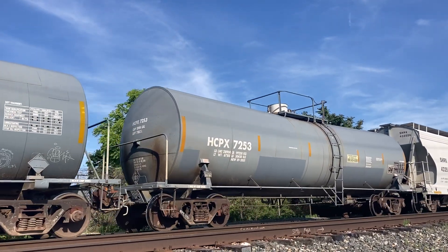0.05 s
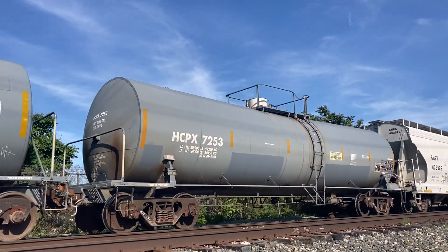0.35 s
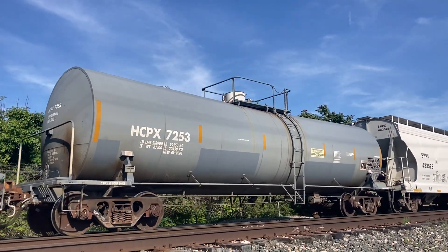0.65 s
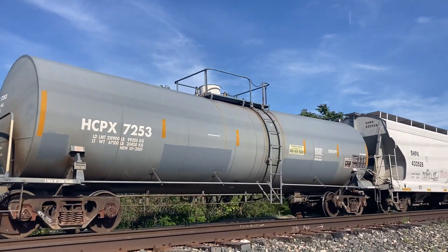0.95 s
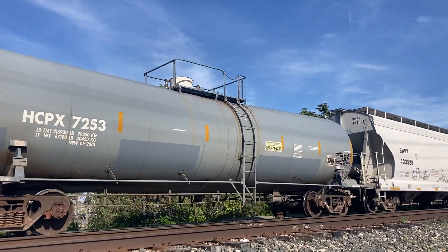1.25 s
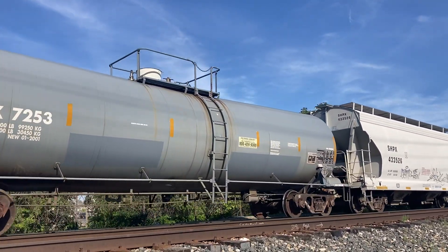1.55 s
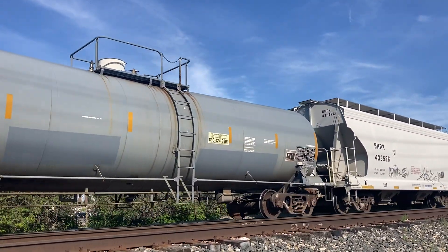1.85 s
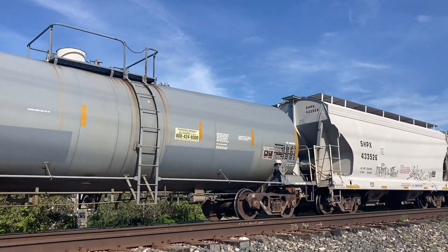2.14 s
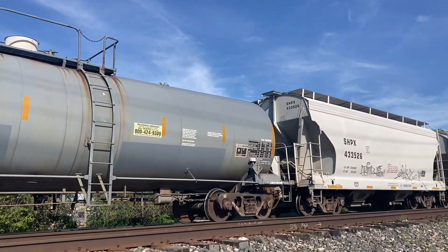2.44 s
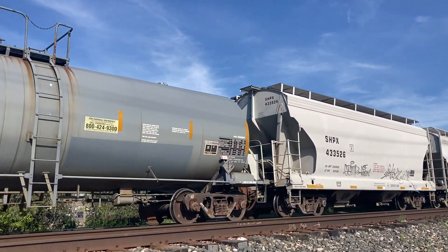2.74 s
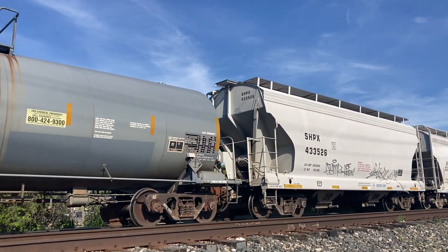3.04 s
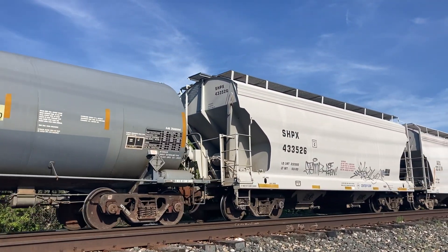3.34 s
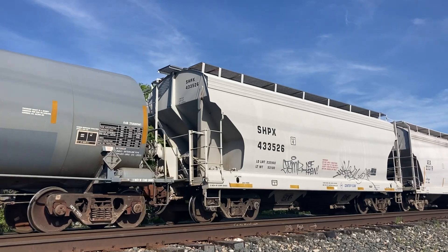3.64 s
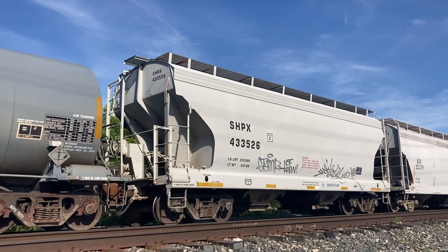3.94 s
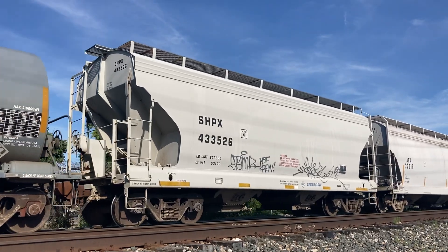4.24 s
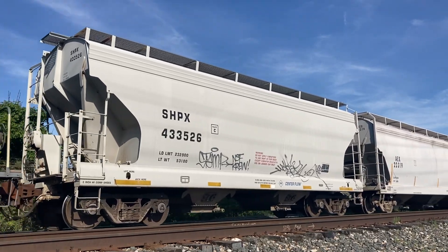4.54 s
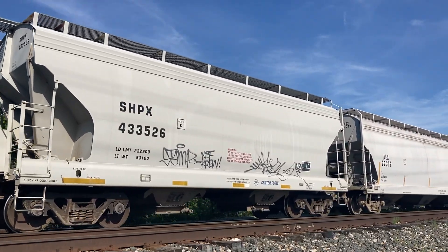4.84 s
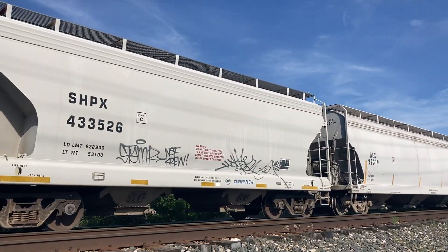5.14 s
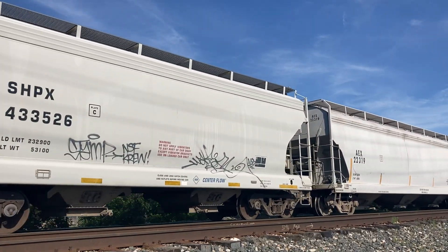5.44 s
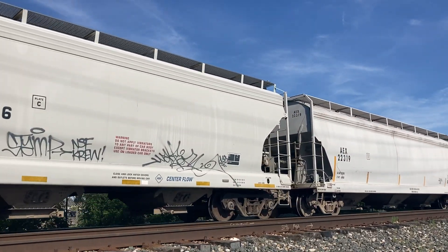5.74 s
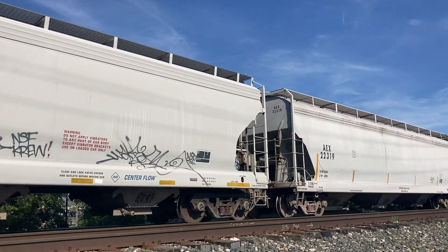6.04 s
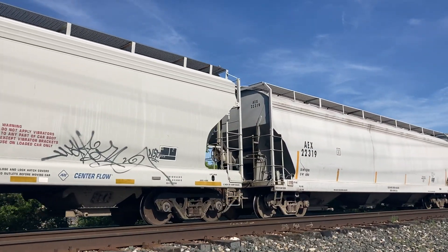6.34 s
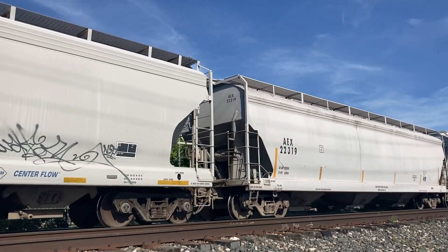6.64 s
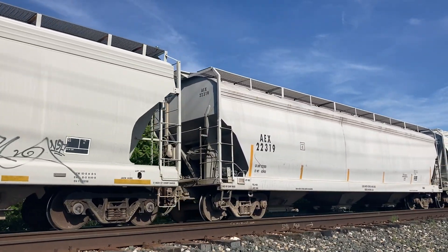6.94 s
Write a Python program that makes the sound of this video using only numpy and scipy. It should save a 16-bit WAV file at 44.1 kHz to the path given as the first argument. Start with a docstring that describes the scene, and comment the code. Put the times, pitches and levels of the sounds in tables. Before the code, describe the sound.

Heard in stereo from beside an outdoor track, a freight train passes with a continuous low rumble and a background roar to the left. Loose metal gear rattles and clanks at first, then a few thin chirps appear. Sharper clanks come around the middle, followed by a short sinking groan. Toward the end, rhythmic wheel grinding, rasping scrapes and squeaks build as a worn wheel comes level with the microphone.

```python
"""A low rumble is heard first: freight cars roll from right to left, shaken by their rough treads.
One worn wheel draws nearer, grinding and throbbing in the same pattern on every turn.
Rolling contact makes the rails sing under each near bogie; slipping steel scrapes, chirps and groans.
Loose gear knocks and clanks, and in the background the cars down the line roar from the left."""
import sys
import numpy as np
from scipy import signal
from scipy.fft import rfft, irfft
from scipy.io import wavfile
from scipy.ndimage import uniform_filter1d, map_coordinates

SR = 44100
rng = np.random.default_rng(int(sys.argv[2]) if len(sys.argv) > 2 else 0)


def int16_out(signal):
    """Quantize to a 16-bit WAV file."""
    q = np.round(np.clip(np.atleast_2d(signal).T, -1, 1) * 32767)
    wavfile.write(sys.argv[1], SR, q.astype(np.int16))


N = 312228
TIME = np.arange(N) / SR
FREQ = np.maximum(np.fft.rfftfreq(N, 1 / SR), 1)

# modes of car bodies, rails, wheels and a coupler: (frequency [Hz], half-width [Hz], level [dB])
BODY_MODES = [(42.4, 17, -14.5), (60, 7.3, -1.5), (65.7, 12, -1.5), (82.6, 17.7, -5.5)]
TRACK_MODES = [(990, 38, 7.5), (1135, 21, 8.5), (1383, 69, 7.5)]
WHEEL_MODES = [(2060, 110, 2.5), (2628, 60, 0.5), (3290, 220, 0.5), (3845, 30, -3), (4070, 104, -1),
               (4935, 18, -5), (5295, 55, -7), (6820, 37, 5.5), (7130, 25, -1), (7800, 64, 6),
               (8040, 72, 3.5), (9880, 76, 7.5), (10320, 91, 5.5), (11200, 86, 0)]
COUPLER_MODES = [(1130, 80, 2), (1340, 95, 4), (1803, 34, 1), (2076, 88, -1), (3750, 80, -12)]
# spectra of the broadband sounds: (frequency [Hz], relative spectral density [dB])
FRAME_SPECTRUM = [(80, -20), (110, 4), (150, -3.5), (195, -7), (240, -18.5), (400, -26.5), (800, -64)]
RAIL_SPECTRUM = [(300, 1.5), (700, 1.4), (1000, 0.5), (1400, -3), (1750, -20), (2300, -1), (3200, -23)]
GRIND_SPECTRUM = [(1200, 4.5), (2000, -5.5), (2600, -1.5), (3100, -3), (4200, -3.5), (5000, -9.5),
                  (5800, -10.5), (7000, -13.5)]
HISS_SPECTRUM = [(4500, -68), (6000, -6), (7000, 1), (7900, 2.5), (8700, -4), (10200, -5), (11500, -4.5),
                 (13000, -8), (15500, -19)]
CRASH_SPECTRUM = [(300, -25), (1300, 11), (2600, -6), (4500, 0.5), (8000, -3), (15000, -12)]
ROAR_SPECTRUM = [(150, -14.5), (240, -2.5), (315, 1), (500, -2.5), (800, -9), (1200, -15), (1600, -14.5),
                 (2100, -20), (2700, -22), (3300, -35.5), (4400, -24), (6000, -43.5)]
# throbs of the low rumble, each a brief fading bass tone: (time [s], level [dB], frequency [Hz])
BASS_THROBS = [(0.306, -14, 78), (.62, -18.5, 78), (0.776, -12, 66.2), (.97, -16, 70.5), (1.223, -13.5, 73),
               (1.349, -12, 78.1), (2.019, -14.5, 67), (2.151, -12, 71.8), (2.656, -12.5, 72.8),
               (2.788, -12.5, 75.7), (3.06, -15, 89), (3.496, -16, 72.7), (3.845, -14.5, 81.8),
               (4.002, -14, 82), (4.149, -14, 79.3), (4.32, -14.5, 70.5), (4.485, -12.5, 74),
               (4.723, -13, 64.2), (5.032, -12.5, 86), (5.148, -10.5, 76.4), (5.253, -17, 71.2),
               (5.505, -12.5, 70), (5.634, -11.5, 68.2), (5.79, -8, 79.3), (5.945, -10.5, 77.2),
               (6.034, -17, 79.5), (6.137, -12, 82.2), (6.511, -8.5, 75), (6.633, -11.5, 81.2),
               (6.755, -11, 73.4), (6.979, -20, 79), (7.036, -10.5, 65.3)]
# one turn of the worn tread: (position [turns], rubbing [dB], frame drone [dB], body shake [dB])
TREAD_PROFILE = [(.02, -8, -2, 1), (.08, 3.5, 1, 2.5), (.17, 1.2, 2, 0.5), (.25, 2.5, 0, 2),
                 (.34, -1.5, 4, -1.5), (.43, 5, 2.2, 3), (.53, 3.5, 0.5, 1.5), (.66, 2, 2.6, 1.3),
                 (.77, 0.5, 2, 2), (.88, -1, -2.5, 1), (.96, -2.5, -0.5, -1)]
# boom of the hopper walls, song of the rails and roar down the line: (time [s], level [dB])
WALL_ENVELOPE = [(0, -41.5), (2.9, -50), (3.6, -41.5), (4.6, -39), (5.5, -42.5), (7.08, -38.5)]
RAIL_ENVELOPE = [(0, -53), (0.9, -47), (1.76, -53.5), (3.43, -45), (3.59, -43), (4.35, -40.5), (4.6, -45),
                 (5.55, -46.5), (6.04, -39.5), (6.22, -44.5), (6.59, -40), (6.85, -42.5), (6.96, -47),
                 (7.05, -35)]
ROAR_ENVELOPE = [(0, -37.5), (.5, -35.5), (1.05, -37.5), (1.45, -36), (1.8, -38), (3.2, -37.5), (4.2, -38),
                 (5.3, -37.5), (6.0, -35), (7.08, -37)]
# direction of the loudest near bogie: (time [s], lag of the left microphone port [ms])
BOGIE_LAG = [(0, 0.13), (3.0, 0.098), (3.6, 0.15), (4.1, -0.12), (4.5, -0.13), (4.8, 0.1), (5.6, 0.067),
             (6.3, 0.034), (7.08, -0.07)]
# slips of treads and flanges: (mid time [s], length [s], centre [Hz], grinding [dB], hiss [dB])
TREAD_SLIPS = [(1.873, 0.063, 3900, -49, -59), (2.49, 0.052, 2500, -45, -58),
               (3.045, 0.082, 2420, -47, -52.5), (3.7, 0.072, 1500, -49, -55),
               (3.805, 0.08, 1730, -42, -54), (4.325, 0.33, 1300, -45.5, -56),
               (4.913, 0.1, 3180, -42.5, -55), (5.068, 0.04, 3006, -40, -47),
               (5.705, 0.15, 3900, -45.5, -51), (5.86, 0.17, 2880, -39.5, -51),
               (6.054, .09, 1100, -47, -62), (6.572, 0.11, 2000, -39.5, -41.5),
               (6.686, 0.032, 1700, -41, -47), (6.807, 0.11, 1700, -42.5, -45.5),
               (7.06, 0.063, 3200, -39, -57)]
# knocks of springs and side frames: (time [s], level [dB], decay time [s], centre [Hz])
BOGIE_KNOCKS = [(.396, -28, .09, 500), (.422, -28, .1, 880), (.446, -26.5, 0.22, 315),
                (.494, -31, 0.32, 624), (.516, -32.5, .4, 322), (0.909, -28, 0.25, 377),
                (1.272, -30, 0.21, 320), (1.436, -30.5, 0.21, 500), (1.491, -31.5, 0.13, 360),
                (2.594, -34, .1, 348), (2.97, -31, 0.12, 476), (3.245, -27.5, 0.17, 195),
                (3.372, -26.5, 0.11, 325), (3.675, -37, .15, 190), (4.15, -30, 0.22, 190),
                (4.86, -33, 0.57, 203), (5.755, -28, 0.56, 189), (6.439, -23.5, 0.22, 200),
                (6.746, -25, 0.22, 190)]
# blows of couplers and brake gear: (time [s], level [dB], decay time [s], ring over crash [dB],
# resonance of the struck part [Hz], that resonance over crash [dB])
GEAR_BLOWS = [(.179, -45, .13, -1, 2500, -4), (.433, -45, 0.19, -9, 4600, 1),
              (0.478, -34, .06, -12, 2670, 2.5), (.912, -46, 0.48, -20, 1900, 2),
              (3.339, -37.5, 0.15, -7, 5100, -10), (3.501, -31, 0.14, -13, 1270, -7),
              (3.518, -39.5, 0.36, -26, 2060, 0), (4.856, -32, 0.13, 3.5, 3850, -5)]
# modes of the loose steel gear: (frequency [Hz], level [dB])
GEAR_MODES = [(3068, 3.5), (4059, 3), (5324, -1), (7919, -7), (11800, -8)]
# chirps of rubbing steel: (mid time [s], length [s], frequency [Hz], level [dB])
STEEL_CHIRPS = [(1.025, .025, 6480, -56), (1.095, 0.021, 6450, -54), (1.137, 0.022, 6500, -55),
                (1.56, 0.037, 6760, -52), (2.236, 0.026, 1590, -40.5), (2.528, 0.018, 2370, -46),
                (3.427, .026, 7080, -49), (3.598, .045, 7060, -44), (3.60, .04, 7950, -49),
                (3.73, .025, 7080, -50), (4.80, .045, 9440, -45.5), (5.64, 0.19, 3870, -49),
                (5.836, 0.046, 3920, -42), (5.952, .04, 4090, -44), (6.274, 0.038, 3950, -42.5),
                (6.365, 0.041, 7980, -45), (6.365, 0.032, 7040, -46), (6.426, 0.023, 7040, -47),
                (6.523, .035, 6800, -40), (6.56, .04, 7650, -44), (6.91, 0.04, 7600, -45)]
# groan of a loaded bolster turning: (time [s], frequency [Hz], level [dB])
BOLSTER_GLIDE = [(4.4, 410, -42), (4.53, 393, -44), (4.61, 384, -33), (4.7, 379, -48), (4.88, 349.6, -37),
                 (5.05, 332, -51)]

TURN_HZ, TURN_START_S, ABREAST_S = 1.342, 0.2535, 6.47  # the worn wheel
SPEED_M_S, TRACK_DISTANCE_M = 4.48, 5.12
WORN_GRIND_DB, WORN_HISS_DB = -29.5, -36  # its base levels at 1 m
TRAIN_GRIND_DB, TRAIN_HISS_DB = -50, -67  # even rubbing of all other wheels
SHAKE_DB, SHAKE_DB_PER_S = -27, 0.38  # shake and drone grow as the heavy hoppers draw near
DRONE_DB, DRONE_DB_PER_S = -34, 0.74
WALL_HZ, WALL_WIDTH_HZ = 200, 15.7
KNOCK_WIDTH, PART_WIDTH, SCRAPE_WIDTH = 0.45, 0.15, 0.65  # half-width over centre frequency


def rumble(drone_db, shake_db):
    """Forced vibration: tread bumps shake bodies and bogie frames; the bass throbs in brief tones."""
    body = steady(resonate(contact(spread_db=1.0, rate=900), BODY_MODES), seconds=0.084)
    frames = ports(lambda: steady(colour(contact(spread_db=0.5, rate=900), FRAME_SPECTRUM), seconds=0.13),
                   lag_ms=-0.058, scatter_db=-9.5, pan_db=0.3)
    throbs = sum(undb(db) * fade(s, 0.76, 0.0053) ** 2 * np.sin(2 * np.pi * hz * (TIME - s))
                 for s, db, hz in BASS_THROBS)
    shake = body * undb(SHAKE_DB + SHAKE_DB_PER_S * TIME + shake_db)
    drone = frames * undb(DRONE_DB + DRONE_DB_PER_S * TIME + drone_db)
    return shake + drone + throbs


def worn_tread():
    """Periodic modulation: the levels of rubbing, drone and shake repeat with each turn of the wheel."""
    position, *columns = np.transpose(TREAD_PROFILE)
    return [np.interp(TURN_HZ * (TIME - TURN_START_S), position, c, period=1) for c in columns]


def near_wheels(rub_db):
    """Rolling contact rings rails and wheels; by spherical spreading the worn one grows as 1 / distance."""
    worn = undb(rub_db) / np.hypot(TRACK_DISTANCE_M, SPEED_M_S * (TIME - ABREAST_S))
    grind_gain = np.hypot(undb(TRAIN_GRIND_DB), undb(WORN_GRIND_DB) * worn)
    hiss_gain = np.hypot(undb(TRAIN_HISS_DB), undb(WORN_HISS_DB) * worn)
    rail_db, = curves(RAIL_ENVELOPE)
    lag_ms, = curves(BOGIE_LAG)
    surge_db = 1.1 * walk(11) + 0.49 * walk(58)  # slow surges and a quick judder
    rail = ports(rail_song, lag_ms, scatter_db=-4, pan_db=5.5)
    grind = ports(tread_grind, lag_ms, scatter_db=-0.5, pan_db=0.5)
    hiss = tread_hiss()
    ring = 0
    for hz, width, db in WHEEL_MODES:
        drive = grind_gain if hz < 6000 else hiss_gain
        waver_db = 2.4 * walk(15)  # the contact patch wanders
        ring += drive * undb(db + waver_db) * resonate(noise(), [(hz, width, 0)])
    rubbing = grind * grind_gain + hiss * hiss_gain + ring * undb(-17)
    return rail * undb(rail_db) + rubbing * undb(surge_db)


def rail_song():
    """Broadband excitation: the rail radiates a band of noise that peaks at its modes."""
    return colour(noise(), RAIL_SPECTRUM) + undb(-3.5) * resonate(noise(), TRACK_MODES)


def tread_grind():
    """Friction noise: bumps and tiny slips of the tread merge into grinding."""
    bumps = contact(spread_db=3.5, rate=6400)
    slips = squeaks(rate=360, length=0.013, spread_db=1.7, low_hz=1404.5, high_hz=6213)
    return colour(bumps + undb(-3.5) * slips, GRIND_SPECTRUM)


def tread_hiss():
    """Friction noise on a finer scale: denser bumps and shorter slips merge into hiss."""
    bumps = contact(spread_db=2.0, rate=12000)
    slips = squeaks(rate=670, length=0.0089, spread_db=1.0, low_hz=6030, high_hz=12870)
    return colour(bumps + undb(-5) * slips, HISS_SPECTRUM)


def squeaks(rate, length, spread_db, low_hz, high_hz):
    """Microslip: each tiny slip of tread on rail sounds a brief, damped note of its own."""
    track, age = np.zeros(N), np.arange(SR // 8) / SR
    for when, pitch, phase, size, stretch in rng.random((int(rate * N / SR), 5)):
        hz = low_hz + (high_hz - low_hz) * pitch
        swell = age / (length * (0.5 + stretch))
        envelope = undb(-spread_db * np.log(size + 0.037)) * swell * np.exp(-swell)
        note = envelope * np.sin(2 * np.pi * (hz * age + phase))
        start = int(when * N)
        track[start:start + len(note)] += note[:N - start]
    return unit(track)


def hopper_walls():
    """Panel resonance: the sheet steel walls boom in one low mode."""
    wall_db, = curves(WALL_ENVELOPE)
    boom = resonate(contact(spread_db=3.5, rate=1200), [(WALL_HZ, WALL_WIDTH_HZ, 0)])
    return undb(wall_db) * steady(boom, seconds=0.23)


def scrapes():
    """Sliding friction: a slipping tread gives a broad, juddering rasp with a fine hiss on top."""
    lag_ms, = curves(BOGIE_LAG)
    grit = ports(lambda: contact(spread_db=1.0, rate=7000), lag_ms, scatter_db=-7, pan_db=1.5)
    hiss = colour(contact(spread_db=4.0, rate=9000), HISS_SPECTRUM)
    slips = 0
    for s, length, hz, grind_db, hiss_db in TREAD_SLIPS:
        rasp = resonate(grit, [(hz, hz * SCRAPE_WIDTH, 0)])
        slips += bell(s, length) * (undb(grind_db) * rasp + undb(hiss_db) * hiss)
    judder_db = 1.1 * walk(35)
    return slips * undb(judder_db)


def knocks():
    """Damped resonance: springs and side frames to the left rattle, each around its own pitch."""
    spectrum = [(170, 2), (600, -3.5), (1000, -11.5)]  # (frequency [Hz], level [dB])
    rattle = ports(lambda: steady(colour(noise(), spectrum), seconds=0.0098),
                   lag_ms=-0.33, scatter_db=-13.5, pan_db=2)
    return sum(undb(db) * fade(s, t60, rise=0.0035) * resonate(rattle, [(hz, hz * KNOCK_WIDTH, 0)])
               for s, db, t60, hz in BOGIE_KNOCKS)


def clanks():
    """Impact excitation: slack gear crashes in the coupler; the struck part and lighter parts ring."""
    crash = unit(colour(noise(), CRASH_SPECTRUM) + undb(5) * resonate(noise(), COUPLER_MODES))
    ring = unit(sum(undb(db) * np.sin(2 * np.pi * hz * TIME + 0.8 * walk(110))  # phase jitter buzzes
                    for hz, db in GEAR_MODES))
    blow, strikes = noise(), 0
    for s, db, t60, ring_db, hz, part_db in GEAR_BLOWS:
        part = resonate(blow, [(hz, hz * PART_WIDTH, 0)])
        steel = unit(crash + undb(ring_db) * ring + undb(part_db) * part)
        strikes += undb(db) * fade(s, t60, rise=0.001) * steel
    return strikes


def chirps():
    """Stick-slip oscillation: a flange or a pin catches and squeaks on one unsteady note."""
    waver = 0.75 * walk(120) + 0.81 * walk(7.4)
    return sum(undb(db) * bell(s, length) * np.sin(2 * np.pi * hz * TIME + waver)
               for s, length, hz, db in STEEL_CHIRPS)


def bolster_groan():
    """Frictional creep: loaded steel plates slide over each other with a rough, sinking note."""
    hz, db = curves(BOLSTER_GLIDE)
    sounding = (TIME > BOLSTER_GLIDE[0][0]) & (TIME < BOLSTER_GLIDE[-1][0])
    envelope = sounding * undb(db + 2.4 * walk(30))
    return envelope * np.sin(2 * np.pi * np.cumsum(hz) / SR + 0.99 * walk(20))


def far_cars():
    """Incoherent summation: the wheels that have gone by merge into a roar from the left."""
    roar_db, = curves(ROAR_ENVELOPE)
    roar = ports(lambda: colour(contact(spread_db=1.5, rate=2500), ROAR_SPECTRUM),
                 lag_ms=-0.4, scatter_db=-4, pan_db=2)
    return roar * undb(roar_db + 1.1 * walk(5.3))


def contact(spread_db, rate):
    """Shot noise: a tread meets the rail in clicks of unequal size, about rate a second."""
    hit = rng.random(N) < rate / SR
    return unit(hit * noise() * undb(spread_db * np.minimum(rng.exponential(size=N), 4)))


def ports(make, lag_ms, scatter_db, pan_db):
    """Path difference: direct sound lags at the left port; scattered sound differs at each port."""
    direct = make()
    delayed = map_coordinates(direct, [(TIME - lag_ms / 1000) * SR], order=3, mode="nearest")
    pair = np.array([delayed, direct]) + undb(scatter_db) * np.array([make(), make()])
    return unit(pair) * undb(np.array([[pan_db], [-pan_db]]) / 2)


def resonate(x, modes):
    """Modal superposition: x passes through steep resonances of alternating sign."""
    response = sum((-1) ** k * undb(db) / (1 + 1j * (FREQ ** 2 - hz ** 2) / (2 * FREQ * width)) ** 2
                   for k, (hz, width, db) in enumerate(modes))
    return unit(irfft(rfft(x) * response, N))


def colour(x, spectrum):
    """Spectral shaping: x takes on a smooth spectrum that falls away beyond its ends."""
    hz, db = np.transpose(spectrum)
    octaves_beyond = np.maximum(np.log2(hz[0] / FREQ), 0) + np.maximum(np.log2(FREQ / hz[-1]), 0)
    gain_db = np.interp(np.log(FREQ), np.log(hz), db) - 20 * octaves_beyond
    return unit(irfft(rfft(x) * undb(gain_db), N))


def steady(x, seconds):
    """Division by the running rms evens out swells longer than the given time."""
    return x / np.sqrt(uniform_filter1d(x ** 2, int(seconds * SR)) + 1e-9)


def fade(start, t60, rise):
    """Exponential decay after a quick rise."""
    age = np.maximum(TIME - start, 0)
    return (1 - np.exp(-age / rise)) * np.exp(-np.minimum(np.log(1000) * age / t60, 20))


def bell(middle, length):
    """Gaussian envelope of a slip."""
    return np.exp(-np.minimum(2 * ((TIME - middle) / length) ** 2, 20))


def walk(rate):
    """Random fluctuation of rms 1, low-passed at rate [Hz]."""
    return unit(irfft(rfft(noise()) * np.exp(-0.5 * (FREQ / rate) ** 2), N))


def noise():
    """White noise."""
    return rng.standard_normal(N)


def curves(table):
    """Linear interpolation of each column over time."""
    s, *columns = np.transpose(table)
    return [np.interp(TIME, s, c) for c in columns]


def undb(db):
    """Decibels to gain."""
    return 10 ** (np.asarray(db) / 20)


def unit(x):
    """Normalisation to rms 1."""
    return x / np.sqrt(np.mean(x ** 2))


def scene():
    """Superposition: the whole train in stereo, eased in and out over 2 ms."""
    rub_db, drone_db, shake_db = worn_tread()
    edges = np.minimum(np.minimum(TIME, TIME[-1] - TIME) / 0.002, 1)
    rolling = rumble(drone_db, shake_db) + hopper_walls() + far_cars() + near_wheels(rub_db)
    return edges * (rolling + scrapes() + knocks() + clanks() + chirps() + bolster_groan())


def record(dry):
    """Stereo colouring: the bass leans right, the high treble is one signal, and both ends are cut."""
    bass_tilt_db, bass_hz, low_cut_hz, high_cut_hz = 1.5, 380, 34, 15700
    tilt = undb(bass_tilt_db / (1 + (FREQ / bass_hz) ** 4))
    left, right = rfft(dry) * np.array([1 / tilt, tilt])
    # above the split the left channel is the right one, inverted and late
    split_hz, lag_s = 6200, 0.000218
    blend = np.pi / 2 * np.clip((FREQ - split_hz) / 700 + 0.5, 0, 1)
    left = np.cos(blend) * left - np.sin(blend) * right * np.exp(-2j * np.pi * FREQ * lag_s)
    sound = irfft(np.array([left, right]) / np.hypot(1, (low_cut_hz / FREQ) ** 4), N)
    return signal.sosfilt(signal.ellip(8, 0.2, 70, high_cut_hz, fs=SR, output="sos"), sound)


dry = scene()
out = record(dry)
int16_out(out)
```